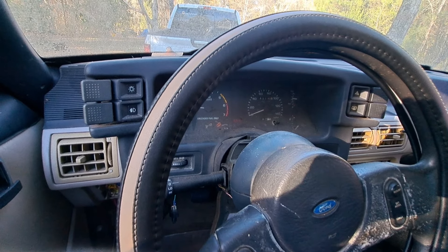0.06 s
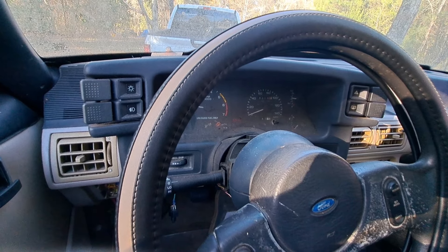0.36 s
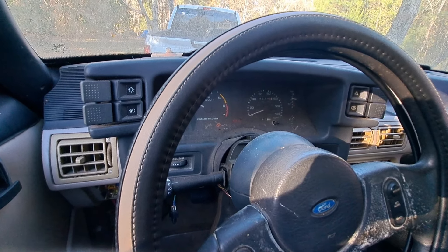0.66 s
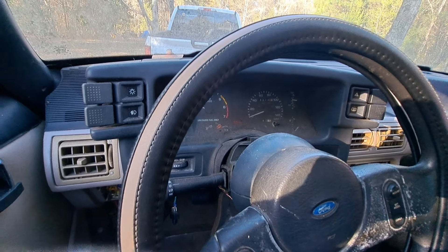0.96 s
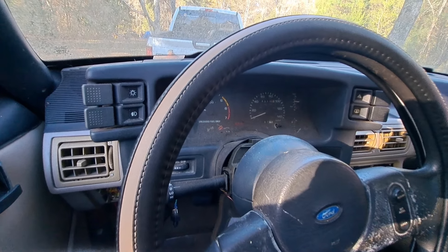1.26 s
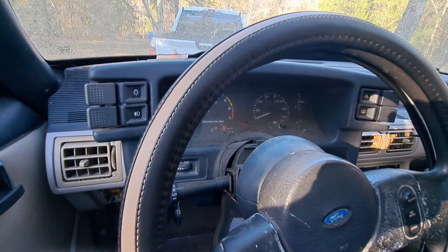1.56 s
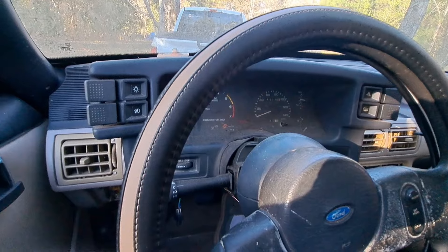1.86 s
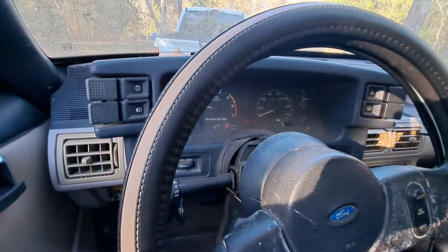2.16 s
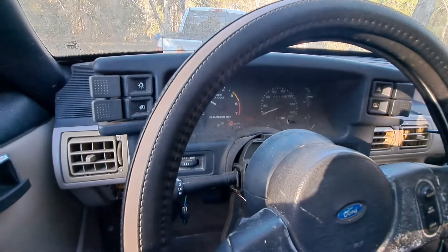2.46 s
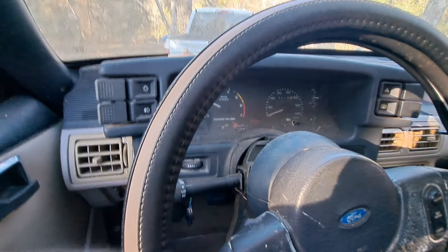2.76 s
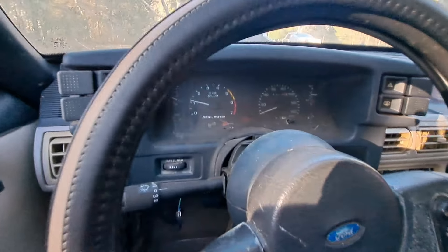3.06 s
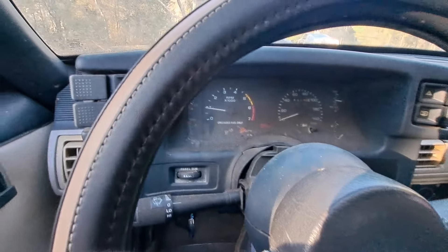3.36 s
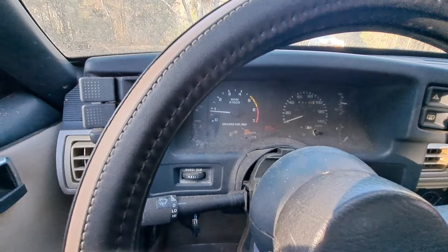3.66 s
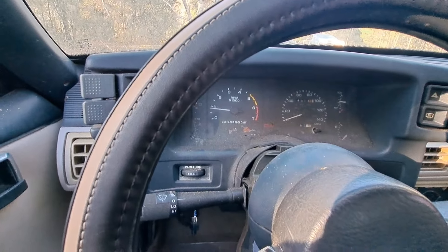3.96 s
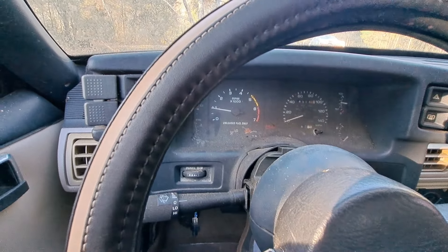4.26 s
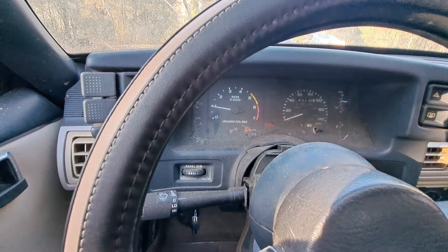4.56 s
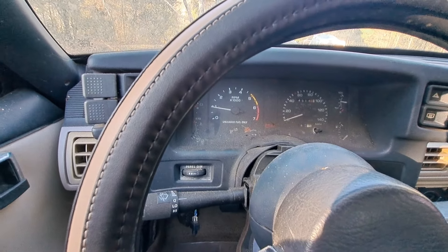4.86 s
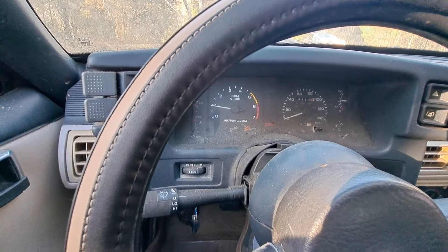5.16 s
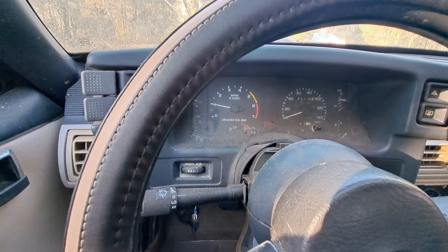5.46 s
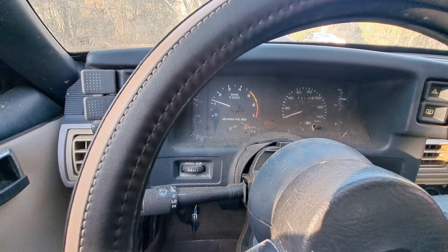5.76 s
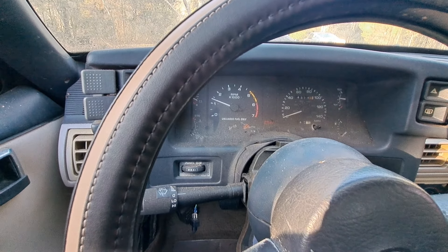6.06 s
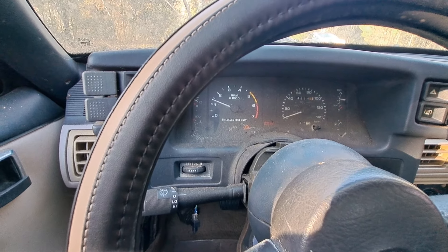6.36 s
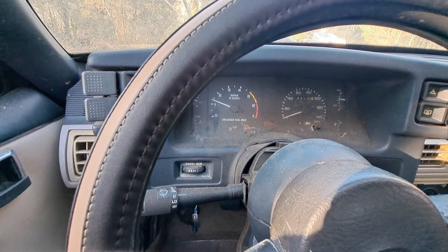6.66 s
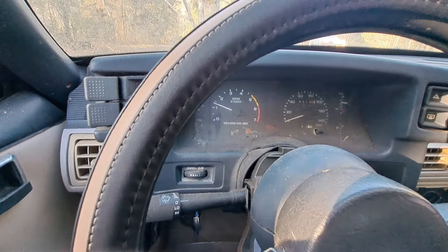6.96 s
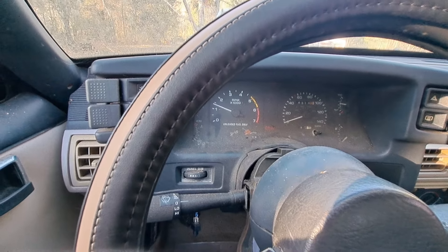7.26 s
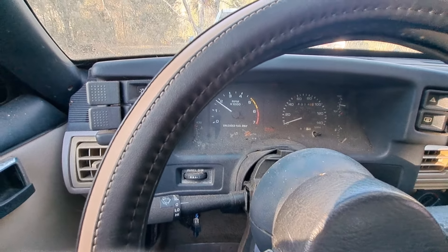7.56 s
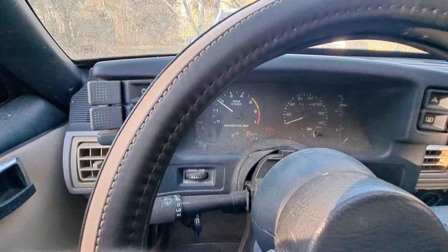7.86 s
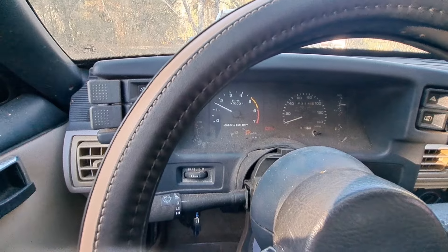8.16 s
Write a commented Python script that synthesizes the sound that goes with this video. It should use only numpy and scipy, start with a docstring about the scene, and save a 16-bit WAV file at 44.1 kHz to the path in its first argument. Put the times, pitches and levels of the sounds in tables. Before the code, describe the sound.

From the driver's seat, a deep, uneven engine idle booms between three quick throttle blips, with light valve clatter and small plastic ticks.

```python
"""Driver's seat of a parked car: an old V8 idles lumpily, with three sharp throttle blips, two light
dabs and a spell of fast idle. Uneven exhaust pulses boom in the cabin's air modes and growl through
the floor. Valves clatter ahead, a pulley hums, and the intake rasps when the throttle opens.
Loose trim ticks now and then over a faint hiss, and a dog yaps somewhere outside."""
import sys
import numpy as np
from scipy import signal
from scipy.fft import rfft, irfft, next_fast_len
from scipy.io import wavfile
from scipy.ndimage import uniform_filter1d, minimum_filter1d, map_coordinates

SR = 44100
rng = np.random.default_rng(int(sys.argv[2]) if len(sys.argv) > 2 else 0)


def store_wav(level_fs):
    """Save 16-bit WAV to argv[1]."""
    pcm = np.round(np.clip(np.atleast_2d(level_fs), -1, 1) * 32767)
    wavfile.write(sys.argv[1], SR, pcm.T.astype(np.int16))


N = 366471
TIME_S = np.arange(N) / SR
CRUISE_HZ = 60  # reference firing rate of the level laws


def amp(db):
    return 10 ** (np.asarray(db) / 20)


def unit_rms(x):
    return x / np.sqrt(np.mean(x ** 2) + 1e-20)


def at_hz(points, hz):
    """Interpolate (f, value) points on a log frequency axis."""
    f, value = np.transpose(points)
    return np.interp(np.log(hz + 1), np.log(f + 1), value)


def per_sample(points):
    """Interpolate (t, value) points at every sample."""
    return np.interp(TIME_S, *np.transpose(points))


def noise_pair():
    return rng.standard_normal((2, N))


def wobble(knots_per_s):
    """Smooth random curve."""
    knots = rng.standard_normal(1024)
    grid = np.arange(0, N, 64)
    coarse = map_coordinates(knots, [grid * knots_per_s / SR], mode="wrap")
    return np.interp(np.arange(N), grid, coarse)


def filtered(x, response):
    """Apply a complex frequency response."""
    size = next_fast_len(N + SR // 2, True)
    return irfft(rfft(x, size) * response(np.fft.rfftfreq(size, 1 / SR)), size)[..., :N]


def mode_cluster(x, hz, width_hz):
    """Steep, causal, ringing band-pass."""
    def response(f):
        detune = 1j * (f * f - hz * hz) / ((f + 1e-6) * width_hz)
        return 1 / ((1 + detune) * (1 + detune + detune * detune))
    return filtered(x, response)


def levelled(x, window_s):
    """Even out slow swells to rms 1; the faster throb stays."""
    size = int(window_s * SR)
    power = np.abs(uniform_filter1d(uniform_filter1d(x * x, size), size))
    return x / np.sqrt(power + 1e-4 * np.mean(x * x))


def patchy(x, depth_db, size=512):
    """Random gain patches, a few hundred Hz by a few tens of ms."""
    spectra = signal.stft(x, nperseg=size)[2]
    field = uniform_filter1d(rng.standard_normal(spectra.shape[1:]), size=5, axis=0)
    field = uniform_filter1d(field, size=7, axis=1)
    return signal.istft(spectra * amp(depth_db * unit_rms(field)), nperseg=size)[1][:, :N]


def puffs(pulses, decay_s, depth):
    """Envelope of rms 1 that jumps at each pulse and decays."""
    pole = np.exp(-1 / (decay_s * SR))
    return unit_rms(1 + depth * unit_rms(signal.lfilter([1], [1, -pole], pulses)))


def reflections(t60_s, size=16384):
    """Two independent decaying tails, energy 1 each."""
    tail = rng.standard_normal((2, size)) * amp(-60 * np.arange(size) / SR / t60_s)
    return tail / np.linalg.norm(tail, axis=1, keepdims=True)


# dash panel resonances: f/Hz, width/Hz, gain/dB
DASH_PANELS = [(335, 40, 2), (387, 25, 3), (600, 40, 2), (822, 60, 1.5), (1100, 400, -3), (1670, 50, 2.5),
               (1850, 40, 1.5), (2150, 60, 3), (2950, 120, 2.5)]
# cabin sound field: f/Hz, left-right correlation
CORRELATION = [(150, -0.8), (300, 0.22), (600, 0.33), (1300, -0.32), (2600, 0.16), (6000, -0.14),
               (14000, -0.1)]

def in_cabin(pair, spectrum, bounce=.3, shared=.62, t60_s=.06, size=8192):
    """Shape two independent signals into stereo, coloured by dash and glass; mid at rms 1."""
    hz = np.fft.rfftfreq(size, 1 / SR)
    panels_db = sum(db / (1 + (2 * (hz - centre) / width) ** 2) for centre, width, db in DASH_PANELS)
    colour = amp(at_hz(spectrum, hz) + panels_db)
    correlation = np.clip(at_hz(CORRELATION, hz), -1, 1)
    spread = np.tan(np.arccos(correlation) / 2) / np.hypot(shared, 1 - shared)
    ahead, across = rfft(reflections(t60_s, size))
    front = (1 + bounce * ahead) / np.hypot(1, bounce)
    paths = colour * np.array([front, spread * shared * across, spread * (1 - shared)])
    impulses = np.fft.fftshift(irfft(paths), axes=1)
    mid, doors, diffuse = signal.oaconvolve(pair[[0, 0, 1]], impulses, "same", axes=1)
    return np.array([mid + doors + diffuse, mid - doors - diffuse]) / np.std(mid)


# speed between blips: t/s, firing rate/Hz
IDLE_SPEED = [(0, 58), (.15, 62), (.44, 64.5), (1.75, 43), (1.9, 44), (2.04, 58), (3.6, 40), (3.75, 46),
              (3.9, 56), (4.15, 61.5), (4.4, 61), (4.65, 57.5), (5.2, 59), (5.38, 64), (5.5, 77),
              (5.66, 86), (5.9, 88.3), (6.47, 85.3), (6.95, 88.2), (7.35, 90.5), (8.31, 60)]
# pedal blips: t/s, time to release/s, closing time/s, opening 0-1, top firing rate/Hz, spin-up/(Hz/s)
BLIPS = [(.345, .21, .235, .89, 122, 310), (1.96, .25, .23, 1, 130, 370), (3.99, .1, .18, .3, 62, 100),
         (5.22, .12, .18, .22, 64, 100), (7.268, .155, .25, .82, 149, 310)]

def crank(lag_s=.08, hang_s=.025, coast_hz_per_s=108, rest_hz=40, ease_hz=21):
    """Firing rate in Hz: after each blip the crank spins up, hangs, then coasts back to idle."""
    idle_hz = per_sample(IDLE_SPEED)
    rate_hz = idle_hz
    for onset_s, _, _, _, top_hz, rev_hz_per_s in BLIPS:
        start_hz = np.interp(onset_s + lag_s, TIME_S, idle_hz)
        since_s = TIME_S - onset_s - lag_s
        rise_s = (top_hz - start_hz) / rev_hz_per_s
        rise_hz = np.minimum(start_hz + rev_hz_per_s * since_s, top_hz)
        fall_hz = top_hz - coast_hz_per_s * (since_s - rise_s - hang_s)
        coast_hz = rest_hz + ease_hz * np.logaddexp(0, (fall_hz - rest_hz) / ease_hz)
        rate_hz = np.maximum(rate_hz, np.minimum(rise_hz, coast_hz))
    return rate_hz


def throttle_plate(open_s=.18):
    """Opening 0-1: the plate eases open and shut at each blip."""
    throttle = np.zeros(N)
    for onset_s, held_s, closing_s, opening, _, _ in BLIPS:
        since_s = TIME_S - onset_s
        ramp = np.clip(np.minimum(since_s / open_s, 1 - (since_s - held_s) / closing_s), 0, 1)
        throttle += opening * np.sin(np.pi / 2 * ramp) ** 2
    return throttle


# firing strength, weakest at the end of a coast: t/s, load/dB
ENGINE_LOAD = [(0, 0), (.17, 2), (.29, -2.5), (.42, 0), (.8, -2.6), (1.3, -7), (1.65, -11.5), (1.93, -10),
               (2.07, -1), (2.2, 0), (2.5, -3.5), (3.55, -15), (3.9, -4), (4.17, 0), (4.6, -3.3),
               (5.17, -2.8), (5.37, 2), (5.55, 0), (7.35, 2.6), (7.68, -7.5), (7.95, -5), (8.31, -7)]

def level_db(law, rate_hz, throttle):
    """Law terms: base/dB, speed slope/(dB/octave), load slope/(dB/dB), full-throttle boost/dB."""
    base_db, per_octave, per_load, boost_db = law
    speed_db = per_octave * np.log2(rate_hz / CRUISE_HZ)
    return base_db + speed_db + per_load * per_sample(ENGINE_LOAD) + boost_db * throttle


# two unequal banks, in firing order: relative strength, delay/firing intervals
CYLINDERS = [(1.2, .02), (.8, .09), (1.1, .025), (.98, .17), (.7, .12), (1.25, .005), (.87, .035),
             (.99, .095)]

def firings(rate_hz, lumpy_db, jitter):
    """One exhaust pulse per firing; combustion is less even at low speed."""
    count = np.arange(1024)
    timing_error, force_error = rng.standard_normal((len(count), 2)).T
    fired = np.cumsum(rate_hz) / SR
    slowness = rate_hz.mean() / np.interp(count, fired, rate_hz)
    strength, delay = np.array(CYLINDERS)[count % 8].T
    at = np.interp(count + delay + jitter * slowness * timing_error, fired, np.arange(N)).astype(int)
    force = strength * amp(lumpy_db * force_error * np.sqrt(rate_hz.mean() / rate_hz[at]))
    return np.bincount(at, force * (at < N - 1), N)


# boom, pipe note, drone, bark: f/Hz, width/Hz, then the four level_db law terms
LOW_MODES = [(45, 16, 45.7, -.7, 1.05, 5), (88, 18, 29, -1.4, .7, 14.5), (127, 21, 43, -4, 1.5, 6.5),
             (156, 16, 19.5, 9, .9, 9)]

def exhaust_boom(rate_hz, throttle, pulses, bank_skew=.2, left_lag_s=.00045):
    """Low pipe and cabin modes swell as engine orders cross them."""
    alternation = np.cos(np.pi * np.cumsum(rate_hz) / SR)  # strong and weak firings in turn
    pulses = pulses * (1 + bank_skew * throttle * alternation)
    boom = sum(mode_cluster(pulses * amp(level_db(law, rate_hz, throttle)), hz, width_hz)
               for hz, width_hz, *law in LOW_MODES)
    return np.array([np.interp(TIME_S - left_lag_s, TIME_S, boom), boom])


# level_db laws of the upper exhaust orders and the valve gear
GROWL_LAW = (-34, 3, .95, 8.3)
CLATTER_LAW = (-53.1, 5.5, .47, 13)
# upper exhaust orders: f/Hz, gain/dB
GROWL_RESPONSE = [(100, -40), (135, -1), (158, 4), (200, -3), (245, -14), (330, -20), (400, -25),
                  (500, -35), (800, -50), (3000, -110)]
# turbulent gas: f/Hz, level/dB
GAS_SPECTRUM = [(100, -40), (180, -3), (260, -4.5), (330, 2.5), (400, -3), (460, -7), (700, -6), (850, -11),
                (1100, -17), (3000, -50)]

def exhaust_growl(rate_hz, throttle, orders_gain_db=2, gas_gain_db=-5):
    """Upper exhaust orders and puffs of turbulent gas come through the floor."""
    pulses = firings(rate_hz, lumpy_db=1.4, jitter=.035)
    orders = levelled(filtered(pulses, lambda hz: amp(at_hz(GROWL_RESPONSE, hz))), window_s=.1)
    gas = in_cabin(noise_pair() * puffs(pulses, decay_s=.005, depth=.5), GAS_SPECTRUM)
    growl_db = level_db(GROWL_LAW, rate_hz, throttle)
    gas_db = (growl_db + level_db(CLATTER_LAW, rate_hz, throttle)) / 2
    return amp(growl_db + orders_gain_db) * orders + amp(gas_db + gas_gain_db) * gas


# valve gear: f/Hz, level/dB
VALVE_SPECTRUM = [(240, -31), (400, -2), (458, -6.5), (734, -5.5), (854, -9), (935, -16.5), (1190, -14.5),
                  (1450, -12.5), (1970, -15), (2790, -21.5), (3290, -27.5), (6040, -34.5), (7930, -44.5),
                  (12300, -41.5), (15000, -48.5)]

def valve_clatter(rate_hz, throttle, scatter_db=4.5, lope_db=.8):
    """Two valves seat per firing, each with its own force; the clatter swells once per eight firings."""
    fired = np.cumsum(rate_hz) / SR
    at = np.flatnonzero(np.diff(np.floor(2 * fired)))
    taps = np.bincount(at, amp(scatter_db * rng.standard_normal(4096)[:len(at)]), N)
    bursts = patchy(noise_pair(), depth_db=1.1) * puffs(taps, decay_s=.003, depth=.45)
    clatter = in_cabin(bursts, VALVE_SPECTRUM)
    swell_db = lope_db * np.sin(2 * np.pi * fired / len(CYLINDERS)) + 1.1 * wobble(14)
    return amp(level_db(CLATTER_LAW, rate_hz, throttle) + swell_db) * clatter


def pulley_hum(rate_hz, ratio=3.81, hum_db=-51.5, slip=.009):
    """A pulley hums at a multiple of the firing rate; its belt slips a little."""
    pitch_hz = ratio * rate_hz * (1 + slip * wobble(30))
    gain = amp(hum_db + 2 * wobble(12) + 2 * wobble(3))
    return gain * np.sin(2 * np.pi * np.cumsum(pitch_hz) / SR)


# background hiss: f/Hz, level/dB
HISS_SPECTRUM = [(180, -32), (300, -2.5), (817, -15.5), (979, -27.5), (1450, -17.5), (1740, -24),
                 (2340, -28.5), (15200, -55)]

def cabin_hiss(hiss_db=-69):
    """Faint, steady, dull noise."""
    return amp(hiss_db) * in_cabin(noise_pair(), HISS_SPECTRUM)


# trim ticks, plus one pedal creak at 1.955 s: t/s, level/dB, ring f/Hz, snap gain/dB, ring gain/dB, t60/s
TRIM_TICKS = [(.1575, -36.5, 1750, -22, -11, .11), (1.955, -50, 2250, -26, -12, .4),
              (3.405, -58, 4200, -19, -20, .15), (3.8141, -50, 1210, -24, -10, .12),
              (3.8535, -44, 1910, -26, -7, .14), (3.895, -52, 3700, -21, -16, .25),
              (4.0281, -48, 1530, -25, -12, .1), (4.095, -45, 2070, -24, -14, .2),
              (4.305, -53, 2200, -20, -14, .25), (4.4144, -47, 1570, -29, -12, .07),
              (4.738, -46, 1640, -26, 13, .07), (4.8417, -45, 1920, -22, -8, .1),
              (4.851, -50, 4200, -22, -6, .13), (4.895, -50, 2500, -20, -9, .12),
              (4.985, -54, 4050, -22, -8, .12), (5.0153, -47, 2280, -26, 5, .1),
              (5.291, -45, 5200, -5, -12, .11), (5.399, -47, 1320, -21, -10, .1),
              (5.5471, -46, 1460, -24, -9, .08), (5.6434, -45, 1680, -28, -10, .07),
              (5.8085, -42, 1900, -22, -9, .15), (7.0427, -45, 1650, -28, -1, .1)]
# body and bright snap of a tick: f/Hz, level/dB
BODY_SPECTRUM = [(500, -25), (1000, -7.5), (1800, 0.5), (3000, -2.5), (5500, -9), (8000, -22.5),
                 (14000, -29.5)]
SNAP_SPECTRUM = [(2000, -30), (5500, 0), (8000, -8), (14000, -10)]

def trim_ticks(attack_s=.005, body_gain_db=-5.5, snap_gain_db=-4, buzz_rad=.5):
    """Loose trim lets go with a short burst, rings briefly and buzzes against its seat; the pedal creaks once
    in the same way."""
    t = np.arange(SR // 4) / SR
    body, snap, ring = np.zeros((3, N + SR))
    waver = buzz_rad * wobble(400)
    for onset_s, db, ring_hz, snap_db, ring_db, t60_s in TRIM_TICKS:
        start = round(onset_s * SR)
        span = slice(start, start + len(t))
        burst = (1 - np.exp(-t / attack_s)) * amp(db - 60 * t / t60_s)
        body[span] += burst * amp(body_gain_db)
        snap[span] += burst * amp(snap_db + snap_gain_db)
        ring[span] += burst * amp(ring_db) * np.sin(2 * np.pi * ring_hz * t + waver[span])
    chatter = unit_rms(amp(3 * wobble(220)))
    body_noise = body[:N] * in_cabin(noise_pair(), BODY_SPECTRUM)
    snap_noise = snap[:N] * in_cabin(noise_pair(), SNAP_SPECTRUM)
    return ring[:N] + chatter * (body_noise + snap_noise)


# intake roar and air past the throttle plate: f/Hz, level/dB
ROAR_SPECTRUM = [(150, -29), (250, -3), (347, -4), (391, 1), (433, -8), (590, -5.5), (740, -13), (835, -9),
                 (1090, -16), (1230, -15), (1380, -19), (1620, -13.5), (3030, -19), (3470, -23.5),
                 (6000, -35), (15200, -60)]
PLATE_SPECTRUM = [(700, -40), (1800, 0), (3000, 0), (5200, -1.5), (8200, -12), (13500, -11), (15200, -23)]

def intake_rasp(rate_hz, throttle, pulses, roar_db=-32, db_per_octave=4, plate_db=-41):
    """Air, gulped at each firing, hisses past the open plate and roars louder as speed builds."""
    gulps = puffs(pulses, decay_s=.004, depth=.5) * amp(.8 * wobble(25))
    roar = throttle ** 2 * in_cabin(noise_pair() * gulps, ROAR_SPECTRUM)
    hiss = throttle ** 2.6 * in_cabin(noise_pair() * gulps, PLATE_SPECTRUM)
    speed_db = db_per_octave * np.log2(rate_hz / CRUISE_HZ)
    return amp(roar_db + speed_db) * roar + amp(plate_db) * hiss


# yaps: t/s, length/s, start f/Hz, end f/Hz, level/dB, tilt/(dB/octave)
YAPS = [(.965, .085, 445, 425, -47, 1), (1.378, .062, 505, 465, -41.5, -.5),
        (1.426, .066, 456, 442, -37.5, -5), (6.108, .05, 505, 465, -40, 1),
        (6.155, .055, 440, 420, -39.5, -1.5)]
# throat formants: f/Hz, gain/dB
THROAT = [(150, -40), (300, -14), (480, 2.5), (680, -16), (880, -3), (1150, -20), (1400, -10), (1870, -6),
          (2150, -17), (2700, -50)]

def dog_yaps(pitch_jitter=.035, rasp=.9, echo_db=-3, t60_s=.32):
    """Short falling yaps, part tone and part rasp, smeared by the yard's echo."""
    voice, waver = np.zeros(N), wobble(260)
    breath = unit_rms(filtered(noise_pair()[0], lambda hz: amp(at_hz(THROAT, hz))))
    for onset_s, length_s, start_hz, end_hz, db, tilt_db in YAPS:
        progress = np.linspace(0, 1, int(length_s * SR))
        start = round(onset_s * SR)
        span = slice(start, start + len(progress))
        pitch_hz = start_hz + (end_hz - start_hz) * progress ** 2
        phase = 2 * np.pi * np.cumsum(pitch_hz * (1 + pitch_jitter * waver[span])) / SR
        tone = sum(amp(at_hz(THROAT, k * pitch_hz) + tilt_db * np.log2(k)) * np.sin(k * phase)
                   for k in range(1, 5))
        yap = unit_rms(unit_rms(tone) + rasp * amp(tilt_db) * breath[span])
        voice[span] += amp(db) * yap * np.sin(np.pi * progress)
    echo = signal.fftconvolve(voice[None], reflections(t60_s), axes=1)[:, :N]
    return voice + amp(echo_db) * echo


def scene():
    """One crank and one throttle drive the engine; trim, dog and hiss are independent."""
    rate_hz, throttle = crank(), throttle_plate()
    pulses = firings(rate_hz, lumpy_db=1.7, jitter=.028)
    exhaust = exhaust_boom(rate_hz, throttle, pulses) + exhaust_growl(rate_hz, throttle)
    engine_bay = valve_clatter(rate_hz, throttle) + intake_rasp(rate_hz, throttle, pulses)
    return exhaust + engine_bay + pulley_hum(rate_hz) + trim_ticks() + dog_yaps() + cabin_hiss()


def limiter(x, ceiling=.98, reaction_s=.008):
    """Duck both channels smoothly around peaks above the ceiling."""
    size = int(reaction_s * SR)
    gain = np.minimum(1, ceiling / (np.abs(x).max(axis=0) + 1e-9))
    return x * uniform_filter1d(minimum_filter1d(gain, 2 * size), size)


# microphone balance: f/Hz, left minus right/dB
MIC_BALANCE = [(60, -2.5), (110, -2.5), (200, -3.5), (380, 0.5), (690, 0), (1280, 1), (2360, 2),
               (4350, -0.5), (8020, 7), (14800, 5.5)]
# low cut: f/Hz, gain/dB
LOW_CUT = [(22, -17), (30, -7), (38, 0)]

def record(dry):
    """Two microphones of unequal colour, low cut, limiter, band limit."""
    def microphones(hz):
        return amp(np.outer([.5, -.5], at_hz(MIC_BALANCE, hz)) + at_hz(LOW_CUT, hz))
    top_hz = 15450
    return filtered(limiter(filtered(dry, microphones)), lambda hz: hz < top_hz)


dry = scene()
out = record(dry)
store_wav(out)
```